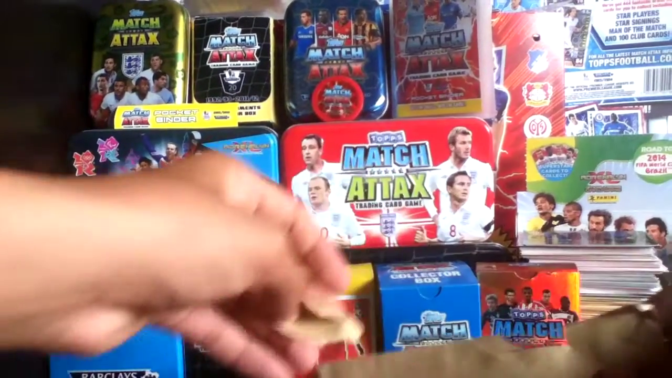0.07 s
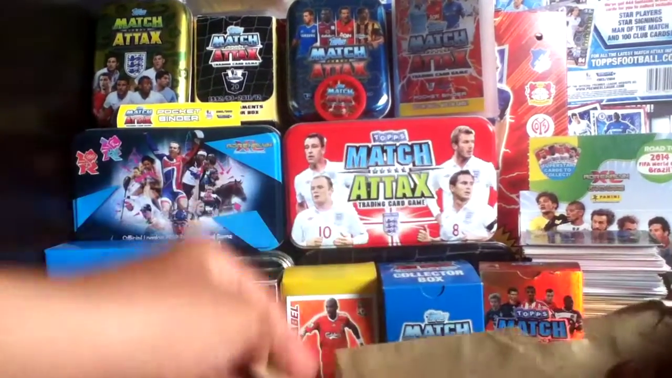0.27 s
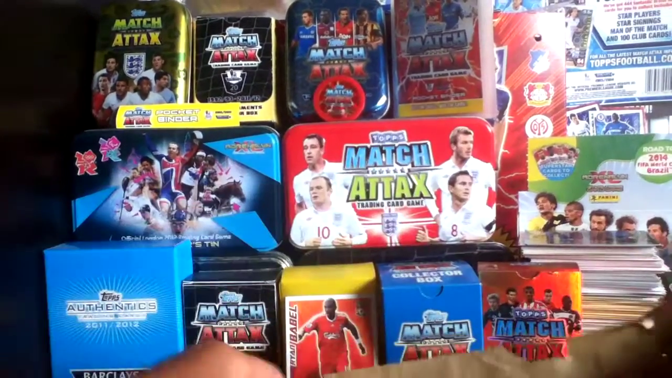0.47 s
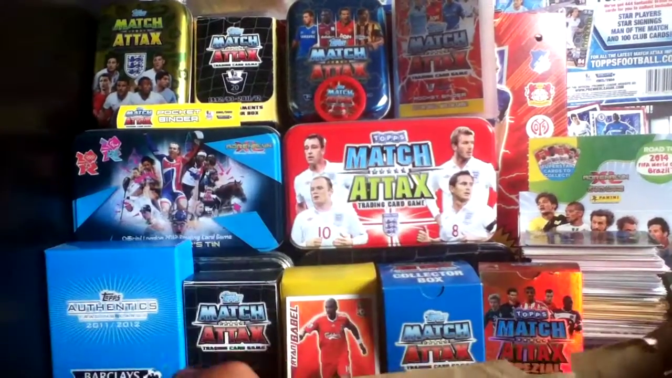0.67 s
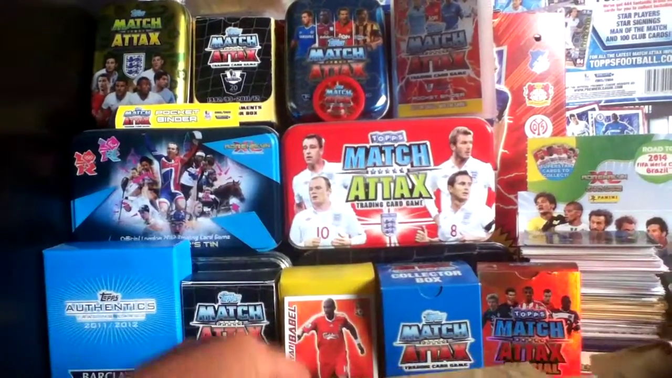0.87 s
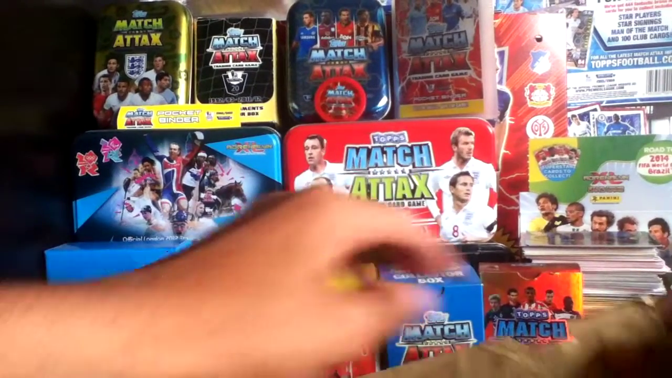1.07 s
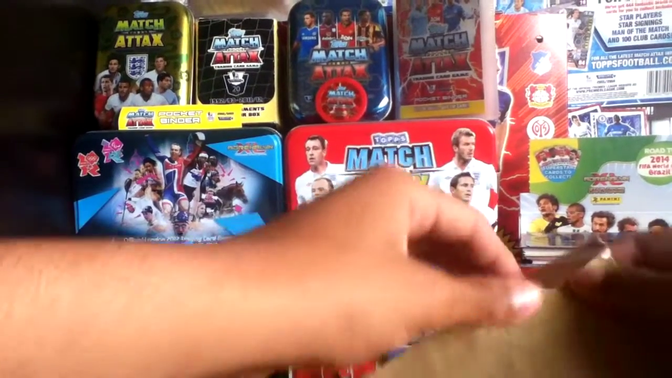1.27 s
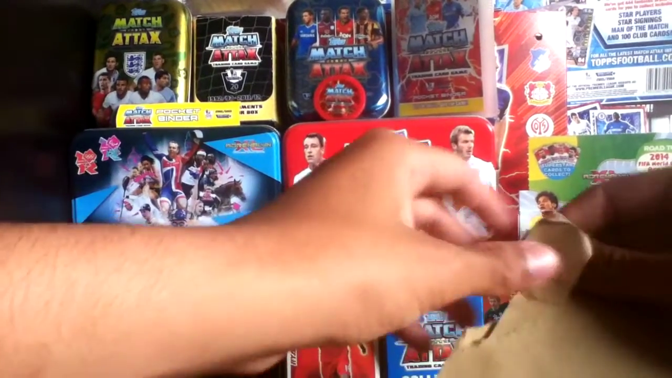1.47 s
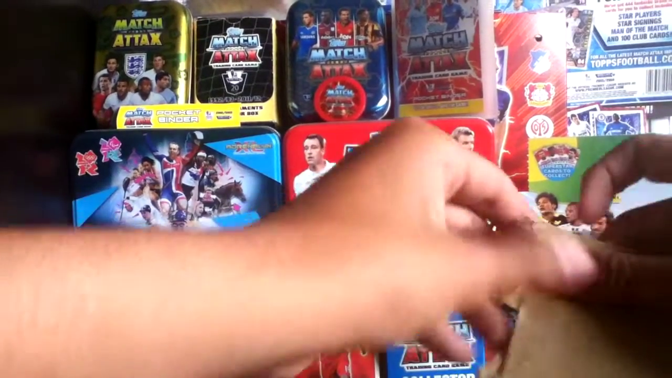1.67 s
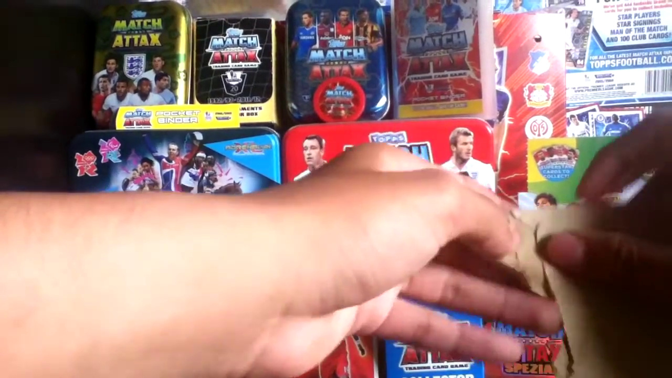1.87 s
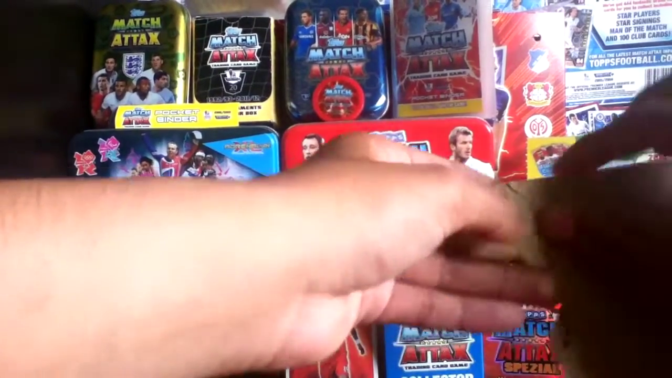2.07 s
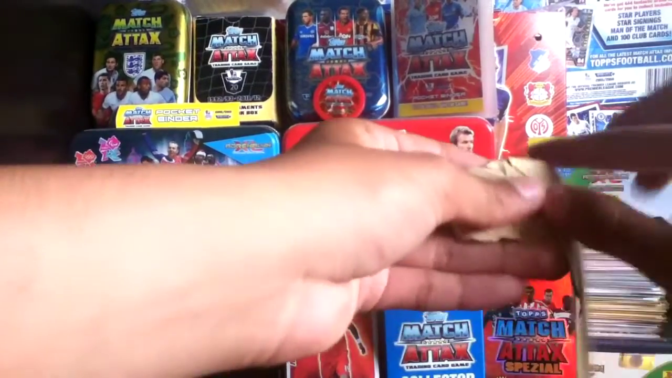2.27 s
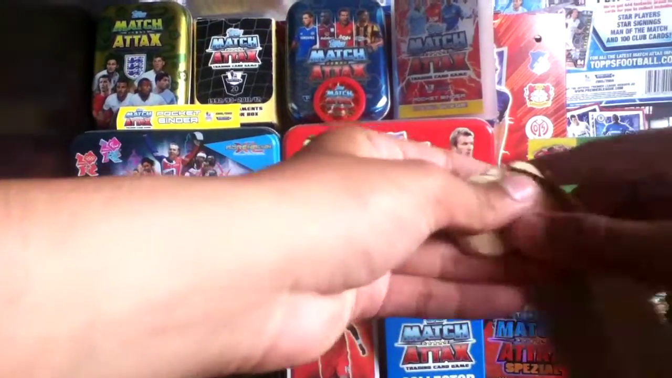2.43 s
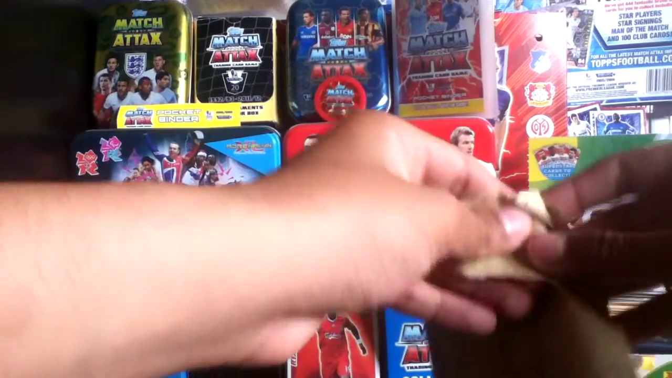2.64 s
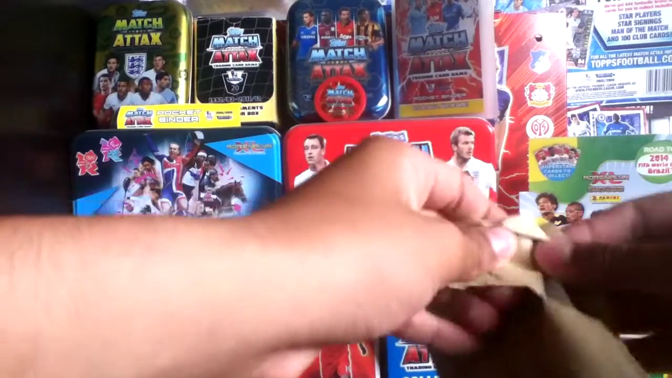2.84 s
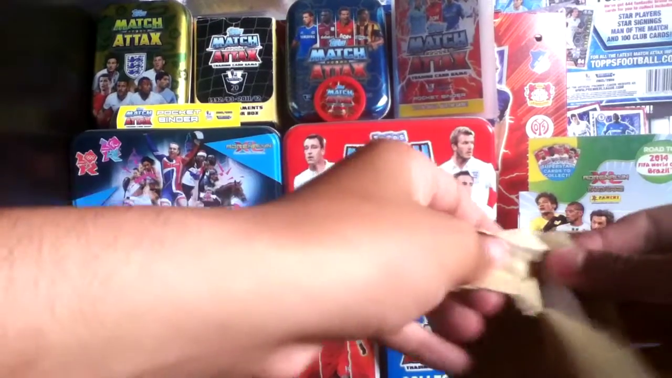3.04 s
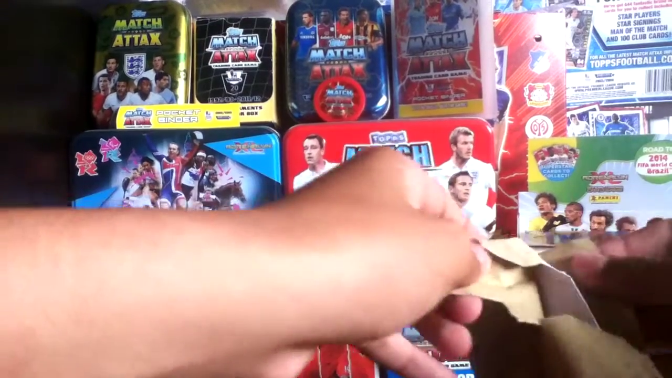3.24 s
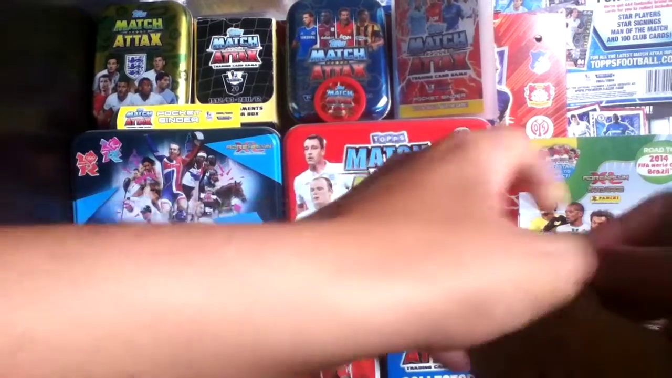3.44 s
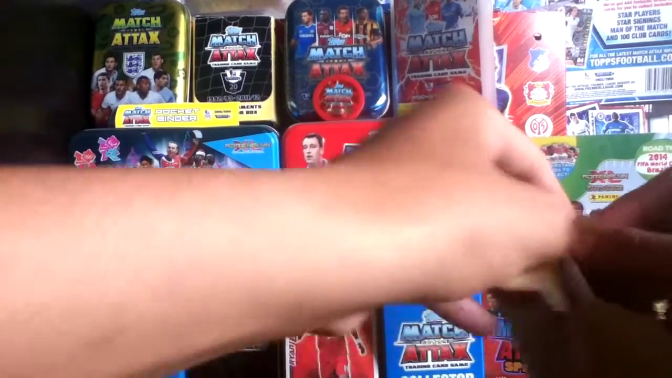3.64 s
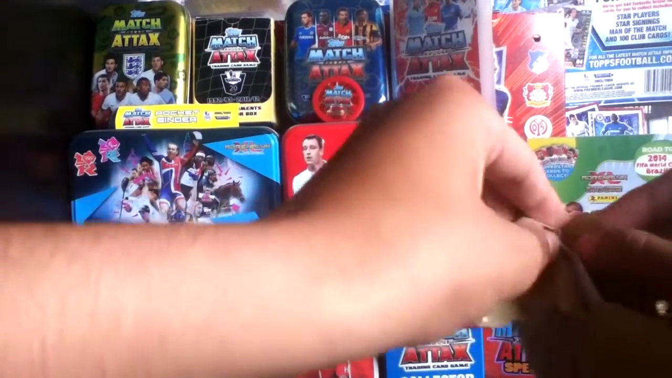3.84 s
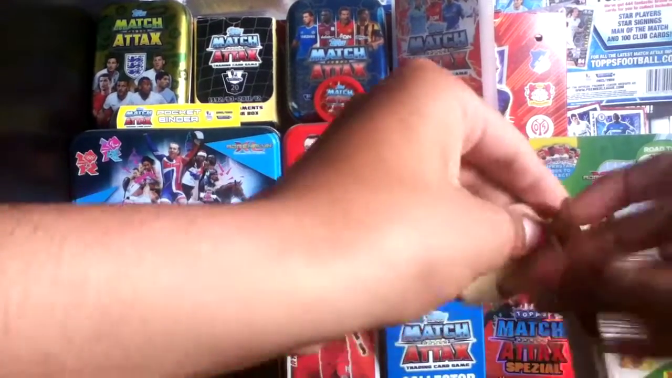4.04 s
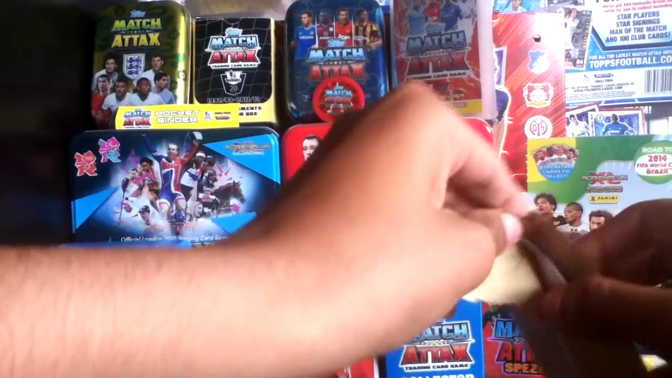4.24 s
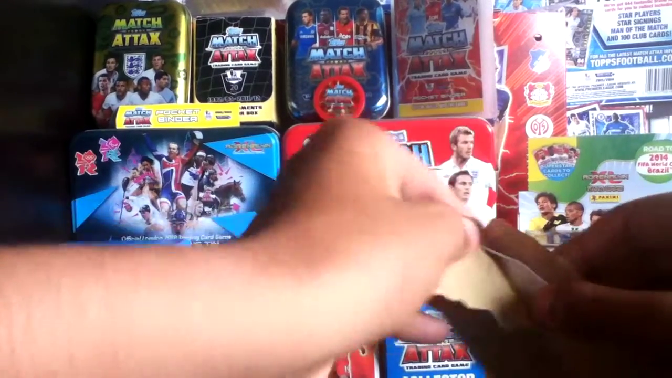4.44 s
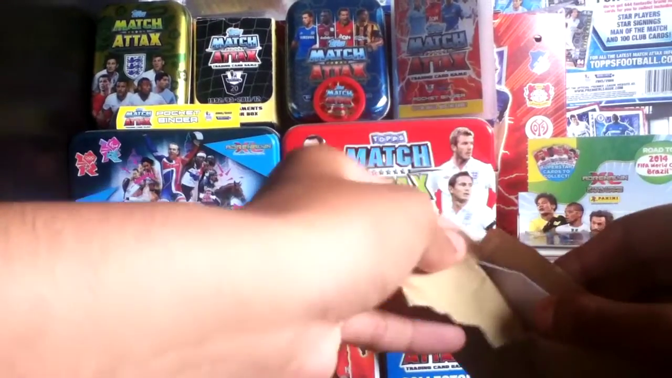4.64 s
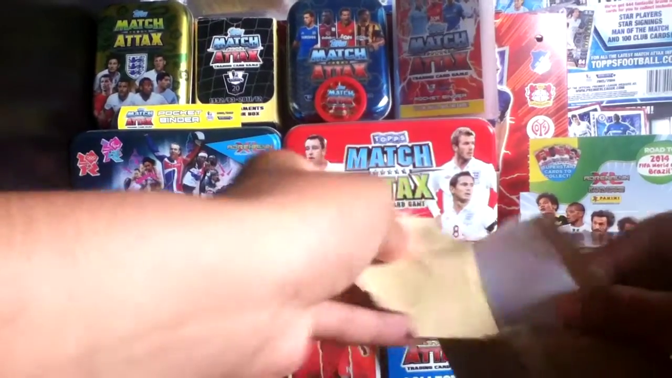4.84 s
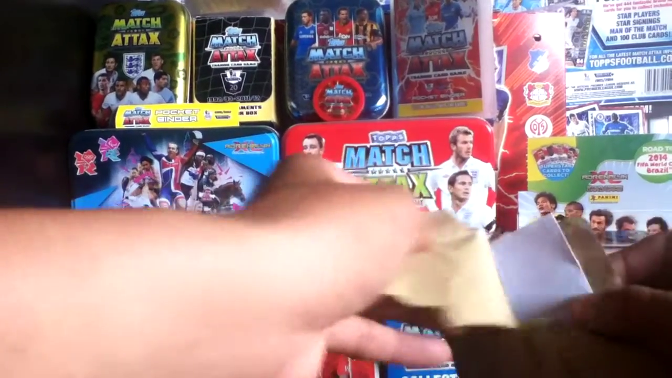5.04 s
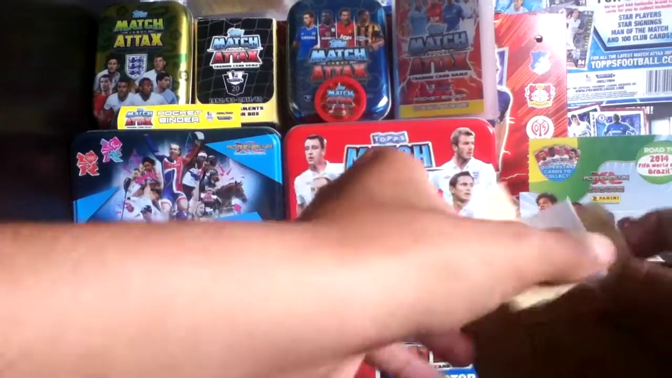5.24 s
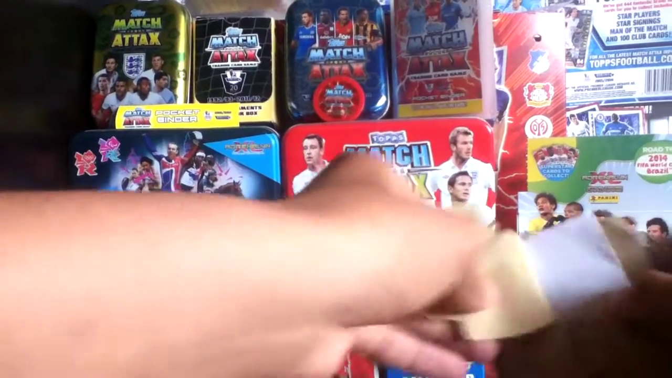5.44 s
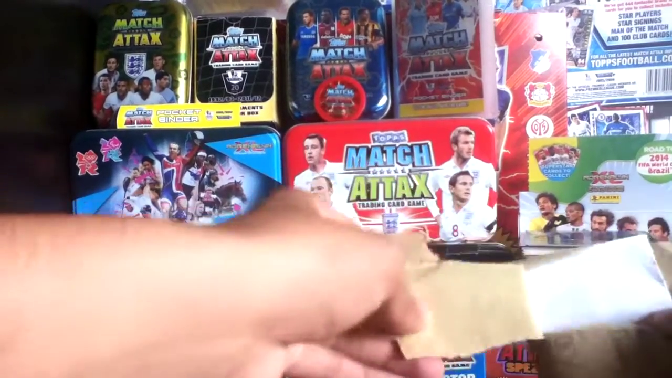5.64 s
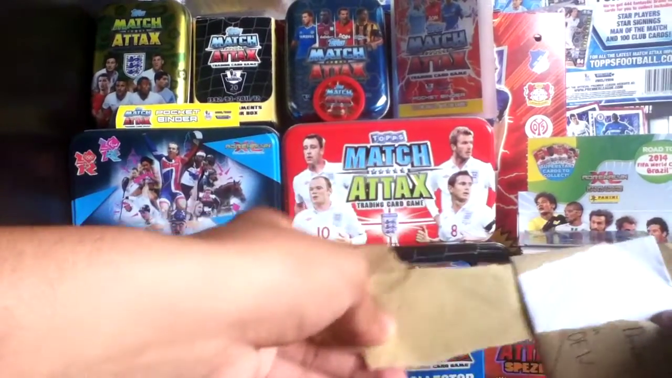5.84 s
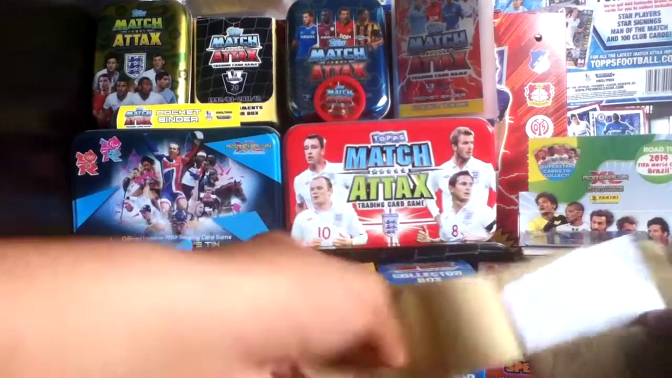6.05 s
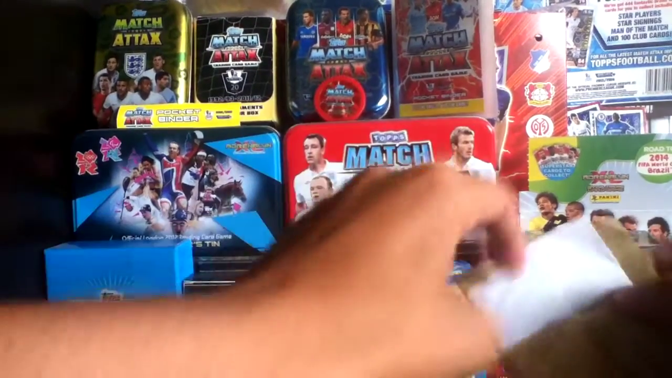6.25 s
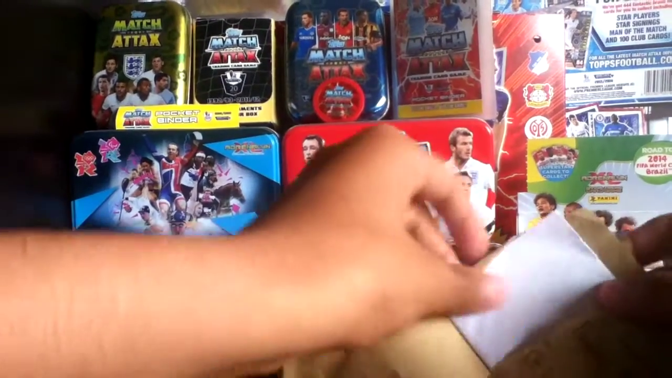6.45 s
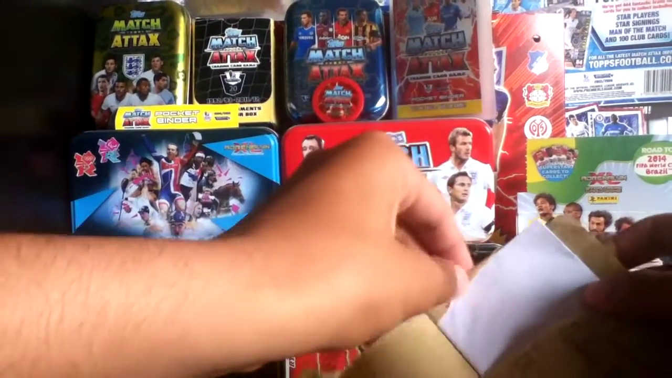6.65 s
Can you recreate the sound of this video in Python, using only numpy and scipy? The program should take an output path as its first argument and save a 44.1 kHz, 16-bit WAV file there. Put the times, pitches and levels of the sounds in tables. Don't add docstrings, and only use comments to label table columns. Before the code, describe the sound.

Close, dry paper handling in a small room: an opening rip dies away at once, fingers slide and catch softly on the sheet, creases pop more and more sharply, then short violent tears burst out in the middle and again near the end, full of bright clicks. Occasional soft knocks on the table. Faint hiss and distant rumble underneath, short echoes from nearby surfaces.

```python
import sys
import numpy as np
from scipy import signal
from scipy.fft import rfft, irfft, next_fast_len
from scipy.io import wavfile
from scipy.ndimage import uniform_filter1d, map_coordinates

SR = 44100
rng = np.random.default_rng(int(sys.argv[2]) if len(sys.argv) > 2 else 0)


def decibels_to_gain(level_db):
    exponent = np.asarray(level_db, float) / 20
    return 10 ** exponent


def to_wav(sig):
    pcm = np.clip(np.atleast_2d(sig), -1, 1) * 32767
    pcm = np.round(pcm).astype(np.int16)
    wavfile.write(sys.argv[1], SR, pcm.T)


N = 296043

# [t/s, level/dB]
PULLS = [
    [(0, -25), (.018, -22), (.028, -17), (.04, -21.5), (.08, -23), (.09, -54), (.15, -66)],
    [(3.186, -43), (3.203, -31), (3.206, -17.5), (3.226, -18), (3.241, -23), (3.245, -34), (3.265, -36)],
    [(3.266, -31), (3.272, -23), (3.29, -31), (3.35, -56.5)],
    [(4.567, -44), (4.573, -22.5), (4.6, -36), (4.625, -43), (4.66, -61)],
    [(4.77, -56), (4.815, -42), (4.83, -29.5), (4.885, -25.5), (4.918, -28), (4.96, -16), (4.992, -12.5),
     (5.02, -25), (5.07, -57)],
    [(5.603, -38.5), (5.642, -15), (5.7, -19.5), (5.734, -17.5), (5.768, -28.5), (5.782, -49), (5.824, -60)],
    [(5.826, -48), (5.89, -31), (5.928, -23.5), (5.952, -18), (5.974, -44), (6.01, -55)],
]
# flap boom [level/dB], crispness of the paper [level/dB], weight of the rip's lower band (below about
# 2.5 kHz) against the rest [level/dB]
PULL_BOOM_DB = [1.5, -3.5, -2, -3, -1.5, -1, -3]
PULL_FIZZ_DB = [0.4, 8, 1.5, 3.5, 0, -0.5, -0.5]
PULL_DEPTH_DB = [0.1, 4.4, 2.2, 0.1, 0.98, 0.99, 0.77]
# [t/s, peak level/dB, f/Hz]
BUMPS = [
    (1.9495, -32, 149),
    (2.397, -37, 470),
    (3.204, -28, 205),
    (3.287, -35, 298),
    (4.263, -40, 487),
    (6.138, -31, 486),
    (6.23, -29, 760),
]

# [f/Hz, density level/dB per Hz]
RIP = [(900, -34), (1550, -4), (2400, -1), (3200, -0.5), (4200, -3), (6000, -16.5), (12000, -30)]
FIZZ = [(3000, -25.5), (4600, -1.5), (6500, 1.5), (9000, -0.5), (12000, -9.5), (16000, -13.5)]
BOOM = [(60, -22), (125, -14), (250, -14.5), (400, 2), (620, -11), (830, 0.5), (1150, -14), (1800, -33.5)]
# [f/Hz, density level/dB per Hz]
SWISH = [(3500, -15), (5500, -2), (7500, -0.5), (10000, -7.5), (13000, -15), (16000, -31)]
SCRAPE = [(1000, -12), (1700, -2.5), (2600, -2), (3500, 0.5), (4600, -5), (6000, -21)]
# [f/Hz, density level/dB per Hz]
RUMBLE = [(15, -47), (30, -17.5), (60, -5), (140, -1), (250, -4), (450, -9), (750, -18)]
HISS = [(1300, -17.5), (3000, -22.5), (9000, -22.5), (12500, -26.5), (16000, -27.5)]
# [f/Hz, t60/s]
WALLS = [(200, 0.2), (2000, 0.16), (6000, 0.11), (14000, 0.12)]
# [delay/s, level/dB]
SHELF = [(.0095, -24), (0.0127, -23.5), (.019, -34)]

# [t of most pressure/s, time to change 20 dB/s (sign ignored), scrape level/dB,
# swish above scrape/dB]
SLIDES = [
    (1.41, -0.34, -56.5, -16),
    (2.375, -0.2, -47.5, -19),
    (2.624, -0.06, -35, -27),
    (2.913, -0.13, -39, -5),
    (3.629, 0.0351, -36, -5.5),
    (3.81, 0.1, -43.5, -2),
    (4.492, 0.74, -57, 6),
    (5.118, 0.06, -49, -7),
    (6.655, 0.07, -50.5, 6),
]
BRUSHES = [(1.385, 0.024, -53.5, -1), (2.165, 0.022, -52, 2), (2.312, 0.019, -57, 9),
           (2.515, 0.046, -57.5, 14), (3.46, 0.069, -42.5, -9), (3.76, 0.09, -60, 11.5),
           (4.185, 0.021, -60, 15), (5.29, 0.045, -50, 0), (5.39, 0.045, -48, 2), (6.03, 0.032, -60, -7),
           (6.431, 0.028, -50, -4)]
# [t/s, grip level/dB]
GRIP = [(0, -62.5), (1.3, -69), (1.45, -67), (1.75, -65), (1.95, -61), (2.42, -57.5), (2.6, -52),
        (3.0, -56), (3.17, -58), (3.36, -53), (3.7, -58.5), (4.15, -63), (4.55, -51.5), (5.1, -72),
        (5.4, -68), (6.02, -54.5), (6.3, -71), (6.71, -65)]
# [start t/s, length/s, scrape level/dB, swish above scrape/dB,
# panel f/Hz]
DRAGS = [(0.308, 0.1, -58, 1, 2300), (0.751, 0.036, -50.5, 5, 2520), (0.813, 0.042, -48.5, 3.5, 3000),
         (1.531, 0.021, -43.5, -11, 2400), (1.598, 0.038, -47.5, 5.5, 1900),
         (1.652, 0.02, -44.5, 5.5, 2130), (1.702, 0.045, -63.5, 8.5, 3000), (1.859, 0.036, -48, 2, 1800),
         (1.925, 0.019, -46, -8, 1700), (1.984, 0.031, -52.5, 1, 1680), (2.198, 0.03, -55.5, 3, 2520),
         (2.236, 0.023, -44, 5, 1600), (2.543, 0.023, -43.5, 3, 3300), (2.662, 0.046, -51, 12.5, 1500),
         (3.922, 0.028, -42.5, -11, 3500), (4.045, 0.045, -50.5, 2, 3980), (4.206, 0.027, -37.5, -10, 3480),
         (4.258, 0.081, -41.5, -1.5, 3060), (4.704, 0.026, -38.5, -3, 2500), (4.74, 0.019, -34, -1, 3000),
         (5.169, 0.038, -48.5, -24, 2200), (5.327, 0.011, -47.5, -22, 2600), (5.463, 0.08, -42, -4.5, 3700),
         (6.485, 0.042, -48.5, -9, 3700), (6.524, 0.013, -44, -20, 3360)]

# [t/s, peak level/dB, panel f/Hz]
TICKS = [(.851, -30, 4496), (1.6262, -22.5, 8043), (1.665, -21.5, 8500), (1.866, -22.5, 5340),
         (2.2484, -23, 7260), (2.3461, -20, 1610), (2.7639, -26, 7500), (2.812, -24.5, 7650),
         (2.959, -18.5, 6100), (3.186, -27, 7100), (3.239, -3, 8960), (3.271, -3.5, 6610),
         (3.3136, -13, 9600), (3.4147, -21, 8300), (4.356, -25, 6937), (4.458, -29, 6950),
         (4.5968, -4, 7000), (4.6163, -3, 5640), (4.6736, -13, 5900), (4.726, -16, 5660),
         (4.746, -18, 5400), (4.7798, -17, 5530), (5.0313, -2.5, 7300), (5.0789, -9, 9440),
         (5.3854, -25, 4640), (5.8416, -14, 6040)]
# [t/s, peak level/dB, panel f/Hz, fizz above peak/dB, boom above peak/dB]
FLIPS = [(1.428, -30.5, 1520, -28.5, -8.5), (1.5335, -32, 2496, -22, -19), (2.602, -4.5, 1710, -2, -16),
         (2.665, -25.5, 1962, -30, -7.5), (2.7406, -13, 3170, -17, -25.5), (2.922, -17, 2000, -32, -16.5),
         (3.457, -22, 3220, -6, -25), (3.549, -26.5, 2900, -23, -11), (3.8176, -11, 2349, -17, -27),
         (3.8482, -11, 2260, -17, -14), (3.954, -19.5, 3700, -2, -23), (4.282, -20.5, 2110, -17, -11.5),
         (4.3787, -18, 2640, -8.5, -12.5), (4.413, -20, 2260, -10, -11), (4.5682, -8.5, 3630, -0.5, -23),
         (4.6943, -11.5, 2430, -1, -45.5), (5.1965, -20.5, 2256, -18.5, -16.5),
         (5.4355, -21.5, 2290, -11, -19)]
# [t/s, peak level/dB, panel f/Hz, boom above peak/dB]
DENTS = [(0.3154, -33, 2570, -16.5), (0.393, -30, 2900, -14), (0.9123, -35.5, 1410, -15),
         (1.115, -39.5, 3124, -24), (1.171, -37, 3340, -8), (1.2184, -39.5, 2674, -17),
         (1.469, -43.5, 990, 7.5), (1.902, -30.5, 1470, -10), (1.929, -30, 1650, -14),
         (2.5645, -23.5, 1670, -9), (2.8849, -12.5, 3440, -15.5), (3.2876, -8, 1890, -9),
         (3.2966, -11, 1510, -15), (3.5737, -25.5, 1580, -8.5), (3.5974, -6, 2960, -21.5),
         (4.4742, -6, 2970, -20.5), (5.088, -19.5, 1610, -19), (5.2085, -26, 2950, -17),
         (5.537, -25, 3030, -12), (6.0935, -35, 3330, -16), (6.137, -12, 4070, -15),
         (6.2043, -27.5, 2560, -9), (6.2286, -10, 3135, -14.5), (6.417, -26, 3800, -18)]
# [t/s, peak level/dB, panel f/Hz, fizz above peak/dB]
CRACKS = [(1.8338, -21.5, 1540, -14), (2.5483, -24, 3330, -18.5), (2.5793, -18, 3500, -35),
          (2.6306, -11.5, 3470, -36), (3.0122, -8.5, 2400, -31), (3.0249, -12, 2120, -60),
          (3.2046, -1.5, 3420, -22), (3.266, -5, 3050, -6), (4.787, -14, 2890, -2), (4.803, -17, 2507, -3),
          (4.816, -9, 2650, -1.5), (4.843, -14, 2920, -1), (4.8823, -6, 2100, -4), (4.9225, -4.5, 2400, -9),
          (4.9341, -3, 2310, -17), (4.9852, -2, 2540, -18), (5.0959, -15, 2920, -8), (5.107, -26, 2470, -3),
          (5.604, -16, 3080, -8), (5.614, -7, 3130, -17), (5.6895, -0.5, 2470, -14),
          (5.826, -20.5, 2378, -7), (5.8717, -10.5, 2470, -2), (5.8937, -5, 2471, -9),
          (5.9295, -1, 2560, -8), (6.032, -30, 2424, -4)]
# [t/s, peak level/dB, f/Hz]
PRICKS = [(0.3487, -34, 7590), (1.4174, -39, 5980), (1.5879, -35, 5927), (1.8345, -27, 5000),
          (1.8864, -37, 7615), (1.9495, -34, 6525), (2.1476, -31.5, 10000), (2.355, -32, 9322),
          (3.1295, -38, 9065), (3.168, -30, 7340), (3.1938, -20, 8917), (3.41, -32, 8400),
          (3.4294, -34, 9070), (4.015, -30.5, 8600), (4.4946, -25, 8070), (4.5033, -20, 8387),
          (4.533, -26, 7150), (4.654, -21, 5258), (4.709, -21, 5600), (5.04, -13, 7100), (5.467, -30, 7700),
          (5.836, -26, 7463), (5.993, -24, 8500), (6.058, -36.5, 8020)]
# [t/s, peak level/dB, f/Hz]
SPLITS = [(0.0098, -4.5, 6546), (2.3441, 2, 4400), (2.6312, -18, 3574), (3.0122, -6, 2400),
          (3.1885, -8, 7200), (3.1941, -13, 10809), (3.2049, 3, 8139), (3.2068, 1.5, 2842),
          (3.2247, 1, 3445), (3.2421, 2, 8613), (3.2666, -5, 3100), (3.2762, -8, 2411), (3.2862, -10, 1740),
          (3.2983, -14, 6330), (3.5979, -9.5, 3359), (3.8179, -10.5, 2480), (3.8483, -10.5, 2300),
          (3.9538, -13.5, 2900), (4.4752, -14, 3000), (4.5705, -5, 3500), (4.5775, -5, 3550),
          (4.5865, -6, 5950), (4.5933, -6.5, 5500), (4.5981, -4, 5570), (4.6008, -7, 6546),
          (4.6032, -5, 5641), (4.6162, -2, 5370), (4.623, -13, 7062), (4.6948, -19, 2411),
          (4.7254, -11, 9000), (4.7864, -14, 2940), (4.8031, -18, 5598), (4.8177, -9, 2583),
          (4.8217, -12, 9300), (4.8436, -14, 6029), (4.8575, -13, 2583), (4.8672, -5, 6976),
          (4.8722, -10.5, 2282), (4.8753, -8, 2583), (4.8779, -6, 6244), (4.8824, 0, 2320),
          (4.9038, -8, 3703), (4.9062, -8, 2842), (4.923, 1.5, 2497), (4.935, -4, 2400),
          (5.0407, -5.5, 6933), (5.605, -9, 7622), (5.6231, -10, 2627), (5.6351, -9, 2928),
          (5.6908, -1.5, 2454), (5.7338, -12, 6546), (5.9121, -9, 6675), (5.9204, -5.5, 2520),
          (5.9493, -0.5, 4220), (6.2295, -9.5, 5211),
          (0.026, -8, 3445), (0.036, -6, 3470), (0.0793, -18, 2713), (2.6012, -4, 5600), (3.2154, 0, 3850),
          (4.1579, -38, 1593), (4.3558, -23, 7149), (4.437, -30, 2928), (4.4454, -34, 6933),
          (4.4567, -25, 7149), (4.4587, -24, 7062), (4.548, -31, 1500), (4.5338, -27, 8268),
          (4.9427, -7, 2282), (4.9495, -5, 2842), (4.9577, -3, 2497), (4.9602, -3, 2430), (4.972, -5, 2300),
          (4.9938, 4, 3080), (5.0021, -5, 6416), (5.0051, -11, 7795), (5.008, -8, 3875),
          (5.0097, -12, 3875), (5.0117, -11, 6632), (5.643, -6, 2900), (5.6556, 0, 2497), (5.671, -4, 2670),
          (5.6979, -7, 2380), (5.7115, -8, 3186), (5.72, -9, 3746), (5.7223, -6, 2325), (5.7294, -5, 3402),
          (5.7473, -9, 2756), (5.766, -15, 1937), (5.9022, -11, 2411), (5.9646, -12, 2520),
          (5.967, -20, 3273), (6.415, -30, 3703)]
# [t/s, peak level/dB, f/Hz]
WRINKLES = [(0.1285, -26, 7278), (1.6005, -34, 8354), (1.651, -33, 6072), (1.6547, -31, 7105),
            (1.6585, -18.5, 7967), (1.6749, -28, 7795), (1.8343, -33, 1550), (1.8754, -34, 2239),
            (1.8844, -33, 7105), (1.9024, -34, 1507), (2.2298, -42, 1679), (2.2362, -37, 5857),
            (2.2602, -26, 7321), (2.3401, -22, 1050), (2.806, -28, 2600), (2.9417, -30, 2713),
            (2.9594, -11, 5900), (3.1835, -20, 8182), (3.415, -38, 6976), (3.8137, -15, 3014),
            (4.1798, -29, 8250), (4.2844, -19.5, 2196), (4.311, -17, 10120), (4.3873, -20, 2325),
            (4.4674, -29, 7192), (4.4699, -20, 8354), (4.5387, -27, 7450), (4.6632, -25, 1636),
            (4.7044, -10, 9819), (4.7074, -15, 5598), (4.7218, -21, 5727), (4.7388, -27, 5641),
            (4.7411, -23, 5598), (4.7483, -23, 2627), (4.7509, -9, 9388), (4.7564, -14, 3660),
            (4.7681, -29, 5297), (4.7723, -15, 5426), (5.0485, -11, 3359), (5.0898, -27, 1636),
            (5.3646, -28, 3250), (5.7723, -16, 1722), (5.8354, -17, 2454), (5.8587, -10, 6115),
            (5.8679, -13, 7062), (5.8839, -16, 2325), (5.9919, -23, 8527), (6.0932, -22, 7105),
            (6.1904, -30, 3574), (6.4469, -32, 1550)]


def unit(x):
    return x / np.sqrt(np.mean(x ** 2) + 1e-20)


def along(points, hz):
    f, value = np.transpose(points)
    return np.interp(np.log(hz + 1), np.log(f + 1), value)


def coloured(x, spectrum):
    length = x.shape[-1]
    size = next_fast_len(length + 8192)
    gain = decibels_to_gain(along(spectrum, np.fft.rfftfreq(size, 1 / SR)))
    return irfft(rfft(x, size) * gain, size)[..., :length]


def room_tone():
    return decibels_to_gain(-52.5) * unit(coloured(rng.standard_normal(N), RUMBLE + HISS))


def strokes(values):
    t = np.arange(N) / SR
    s, level = np.transpose(np.concatenate(PULLS))
    moving = np.array([(t >= rows[0][0]) & (t <= rows[-1][0]) for rows in PULLS])
    force_db = np.where(moving.any(0), np.interp(t, s, level), -120)
    return force_db, np.dot(values, moving)


def shivers(spectrum, t60, count, rise_hz=9000):
    t = np.arange(SR // 20) / SR
    noise = coloured(rng.standard_normal((count, len(t))), spectrum)
    x = noise * decibels_to_gain(-60 * t / t60) * (1 - np.exp(-t * rise_hz)) ** 2
    return x / np.linalg.norm(x, axis=1, keepdims=True)


def pops(rate, spread_db, clump_db):
    when = rng.random(N) < rate / SR
    sign = rng.choice([-1, 1], N)
    size = decibels_to_gain(spread_db * np.minimum(rng.exponential(size=N), 3.8)) * sign
    clump = map_coordinates(rng.standard_normal(N // 256 + 4), [np.arange(N) / 256])
    return unit(when * size * decibels_to_gain(clump_db * clump))


def radiate(breaks, spectrum, t60, count=8):
    patch = rng.integers(count, size=N) == np.arange(count)[:, None]
    return signal.fftconvolve(patch * breaks, shivers(spectrum, t60, count), axes=1)[:, :N].sum(0)


def patchy(x, depth_db):
    z = signal.stft(x, nperseg=256)[2]
    field = uniform_filter1d(rng.standard_normal(z.shape), size=7, axis=0)
    field = uniform_filter1d(field, size=12, axis=1)
    return signal.istft(z * decibels_to_gain(depth_db * unit(field)), nperseg=256)[1][:N]


def tear():
    force_db, crisp_db = strokes(PULL_FIZZ_DB)
    flap_db = strokes(PULL_BOOM_DB)[1]
    depth = decibels_to_gain(strokes(PULL_DEPTH_DB)[1])
    gentleness_db = -21.5 - force_db
    fizz_db = crisp_db + 0.24 * gentleness_db
    boom_db = flap_db - 12 + 0.058 * gentleness_db
    breaks = pops(rate=3000, spread_db=2.3, clump_db=1.8) * decibels_to_gain(force_db + 1.77)
    rip = radiate(breaks, RIP, t60=0.014)
    deep = coloured(rip, [(2100, 1.5), (2900, -6)])
    rip = deep * depth + (rip - deep) / depth
    fizz = radiate(breaks * decibels_to_gain(fizz_db), FIZZ, t60=0.0061)
    boom = radiate(breaks * decibels_to_gain(boom_db), BOOM, t60=0.033)
    return patchy(rip + fizz + boom, depth_db=3.0)


def place_events(s, events):
    length = events.shape[1]
    out = np.zeros(N + length)
    np.add.at(out, np.round(s * SR).astype(int) + np.arange(length), events)
    return out[:N]


def splits(rows, gain_db, cycles):
    s, db, hz = np.transpose(rows)[:, :, None]
    fizz = decibels_to_gain(6.5) * shivers(RIP[:4] + FIZZ[1:], 0.0066, len(s), rise_hz=12000)
    t = np.arange(fizz.shape[1]) / SR
    phase = 2 * np.pi * (hz * t + rng.random(s.shape))
    ring = 1.33 * decibels_to_gain(-60 * t * hz / cycles) * (1 - np.exp(-t * 15000)) * np.sin(phase)
    edge = (t - .0002) * 22000
    needle = decibels_to_gain(-4) * (edge ** 2 - 1) * np.exp(-edge ** 2 / 2) * np.sign(np.sin(phase[:, :1]))
    return place_events(s + .0003, decibels_to_gain(db + gain_db) * (ring + needle + fizz))


def single_fibres():
    torn = splits(SPLITS, gain_db=0.0, cycles=11.2)
    rubbed = splits(WRINKLES, gain_db=-3.0, cycles=9.3)
    x = coloured(torn + rubbed, [(500, -20), (1300, 0)])
    return x + room(x)


def room(x):
    early = sum(decibels_to_gain(db) * np.pad(x, (round(s * SR), 0))[:N] for s, db in SHELF)
    hz, t, z = signal.stft(rng.standard_normal((6, SR // 3)), SR, nperseg=256)
    tails = signal.istft(z * decibels_to_gain(-60 * t / along(WALLS, hz)[:, None]), SR, nperseg=256)[1]
    place = np.arange(N) // 4096 % len(tails) == np.arange(len(tails))[:, None]
    late = signal.fftconvolve(place * x, tails / np.linalg.norm(tails[0]), axes=1).sum(0)
    return early + decibels_to_gain(-14.5) * np.pad(late, (300, 0))[:N]


def rub():
    t = np.arange(N) / SR
    s, fade, db, swish_db = np.transpose(SLIDES + BRUSHES)[:, :, None]
    slides = decibels_to_gain(db - 20 * np.abs((t - s) / fade) ** 1.02)
    pressure = slides.sum(0)
    grip = decibels_to_gain(np.interp(t, *np.transpose(GRIP)))
    coarse = pops(rate=3500, spread_db=2.8, clump_db=1.8)
    fine = pops(rate=12000, spread_db=1.6, clump_db=.8)
    dull = pops(rate=1500, spread_db=2.5, clump_db=2.5)
    drag, drag_swish = drags(coarse)
    scrape = radiate(coarse * (pressure + grip), SCRAPE, t60=0.012) + drag
    for hz in (1630, 3370):
        scrape += decibels_to_gain(8) * signal.lfilter(*signal.iirpeak(hz, 11, SR), coarse * grip)
    swish_pressure = (slides * decibels_to_gain(swish_db)).sum(0) + drag_swish + grip * decibels_to_gain(-2)
    swish = radiate(fine * swish_pressure, SWISH, t60=0.0048, count=16)
    rumple = radiate(dull * (pressure * decibels_to_gain(-18) + grip * decibels_to_gain(1)), BOOM, t60=0.011)
    return patchy(scrape + swish + rumple, depth_db=2.5)


def drags(coarse):
    catch_s, let_go_s, panel_q = 0.0057, 0.0078, 2.16
    t, scrape, swish = np.arange(N) / SR, np.zeros(N), np.zeros(N)
    for s, length, db, swish_db, hz in DRAGS:
        near = slice(round((s - .03) * SR), round((s + length + .06) * SR))
        outside = np.maximum((s - t[near]) / catch_s, (t[near] - s - length) / let_go_s)
        pressure = decibels_to_gain(db - 20 * np.maximum(0, outside))
        ringing = signal.lfilter(*signal.iirpeak(hz, panel_q, SR), coarse[near] * pressure)
        scrape[near] += ringing * np.sqrt(SR * panel_q / (np.pi * hz))
        swish[near] += pressure * decibels_to_gain(swish_db)
    return scrape, swish


def snaps(rows):
    s, db, hz, fizz_db, boom_db, spike_db, body_db = np.transpose(rows)[:, :, None]
    crack = decibels_to_gain(body_db + 8.0) * shivers(RIP, 0.032, len(s), rise_hz=4925)
    fizz = decibels_to_gain(fizz_db + 16) * shivers(SWISH, 0.017, len(s), rise_hz=12000)
    boom = decibels_to_gain(boom_db + 19.5) * shivers(BOOM, 0.024, len(s), rise_hz=2020)
    t = np.arange(crack.shape[1]) / SR
    wander = 0.062 * np.cumsum(rng.standard_normal(crack.shape), axis=1)
    swell = decibels_to_gain(-6.0 - 60 * t * np.sqrt(hz) / 1.02) * (1 - np.exp(-t * hz))
    ring = swell * np.sin(2 * np.pi * hz * t + wander)
    flip = (t - .0005) * 13000 * decibels_to_gain(np.minimum(fizz_db, 0) / 4)
    spike = decibels_to_gain(spike_db) * (flip ** 2 - 1) * np.exp(-flip ** 2 / 2)
    return place_events(s, decibels_to_gain(db) * (crack + fizz + boom + ring + spike))


def creases():
    # t/s, peak level/dB, f/Hz, then fizz, boom, spike, body above peak/dB
    ticks = [(*row, -7.5, -23.5, -19, -6) for row in TICKS]
    flips = [(*row, -4.1, 0) for row in FLIPS]
    dents = [(s, db, hz, -13, boom_db, -22, 0) for s, db, hz, boom_db in DENTS]
    cracks = [(*row, -25, -16, 0) for row in CRACKS]
    return snaps(sorted(ticks + flips + dents + cracks))


def pricks():
    return snaps([(*row, -6, -60, -16, -25) for row in PRICKS])


def bumps():
    s, db, hz = np.transpose(BUMPS)[:, :, None]
    t = np.maximum(np.arange(N) / SR - s, 0)
    cycles = hz * (t + 0.0021 * (1 - np.exp(-t / 0.0025)))
    swell = decibels_to_gain(db + 5.0 - 60 * t * np.sqrt(hz) / 1.09) * (1 - np.exp(-t / 0.0014))
    return (swell * np.sin(2 * np.pi * cycles)).sum(0)


def scene():
    paper = tear() + rub() + creases()
    paper = paper + room(paper) + pricks() + single_fibres()
    paper = coloured(paper, [(50, -16.5), (160, -1.0), (16000, -2.5)])
    return (paper + bumps() + room_tone())[None]


def top_cut(x):
    return signal.sosfilt(signal.butter(12, 16840, fs=SR, output="sos"), x)


def record(dry):
    keep = np.exp(-1 / (.09 * SR))
    loudness = signal.lfilter([1 - keep], [1, -keep], dry ** 2)
    x = dry / (1 + loudness / decibels_to_gain(-36.0) ** 2) ** 0.093
    x = x / (1 + np.abs(x / .97) ** 6) ** (1 / 6)
    x = coloured(x, [(15850, 0), (15910, -40), (16900, -44), (17000, -70)])
    return top_cut(x)


dry = scene()
out = record(dry)
to_wav(out)
```